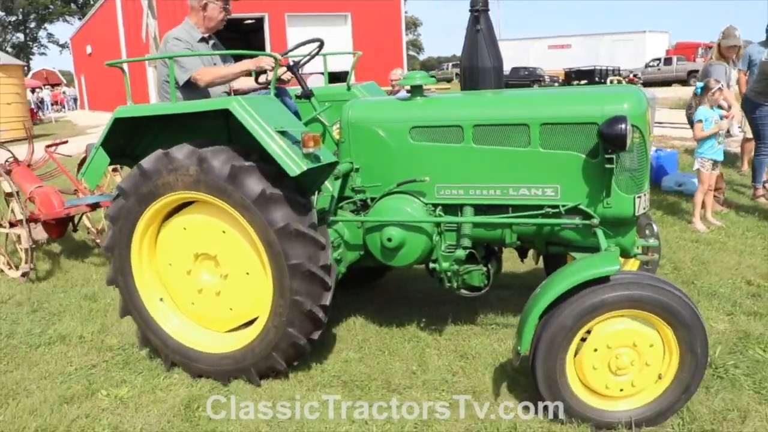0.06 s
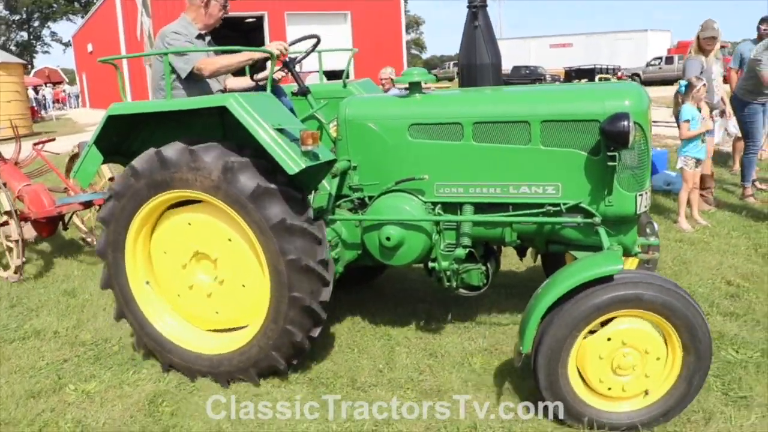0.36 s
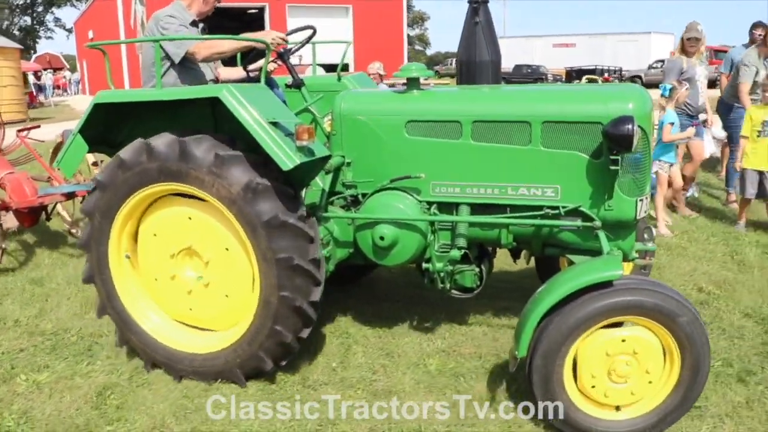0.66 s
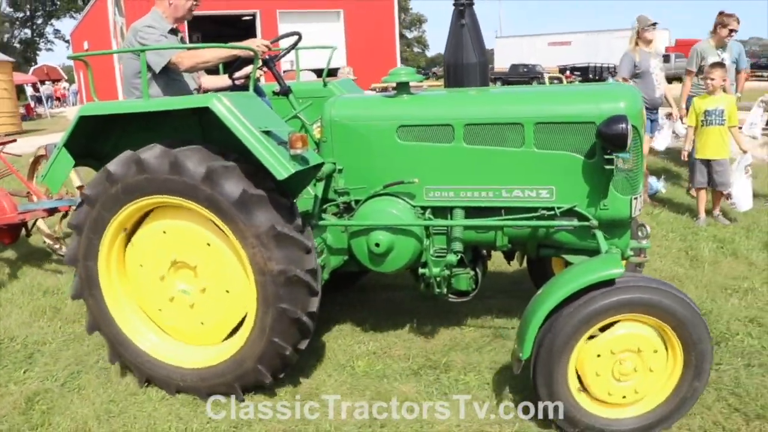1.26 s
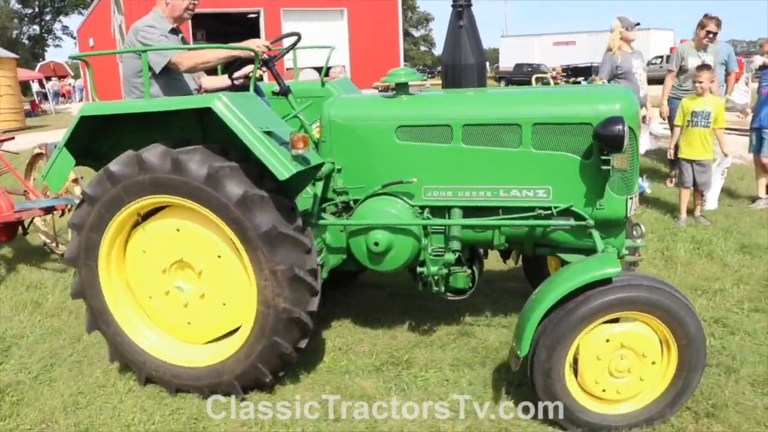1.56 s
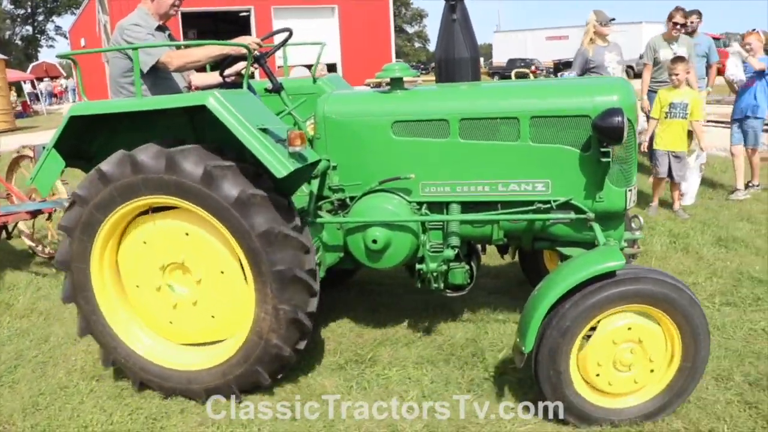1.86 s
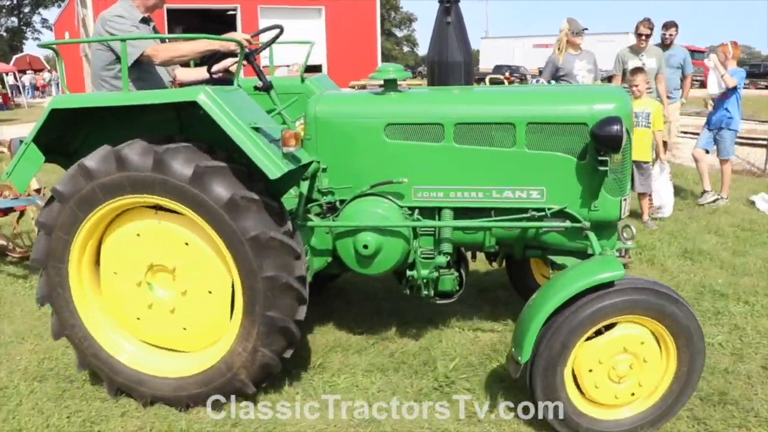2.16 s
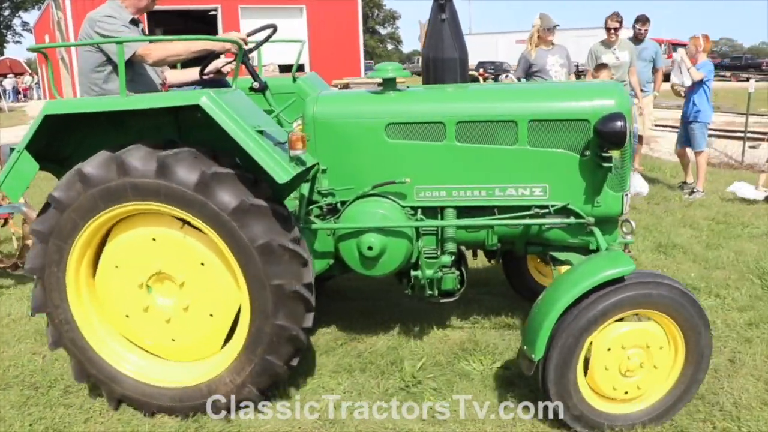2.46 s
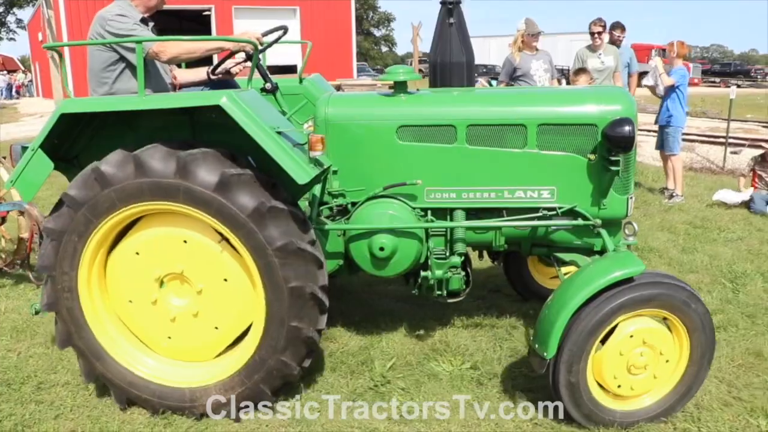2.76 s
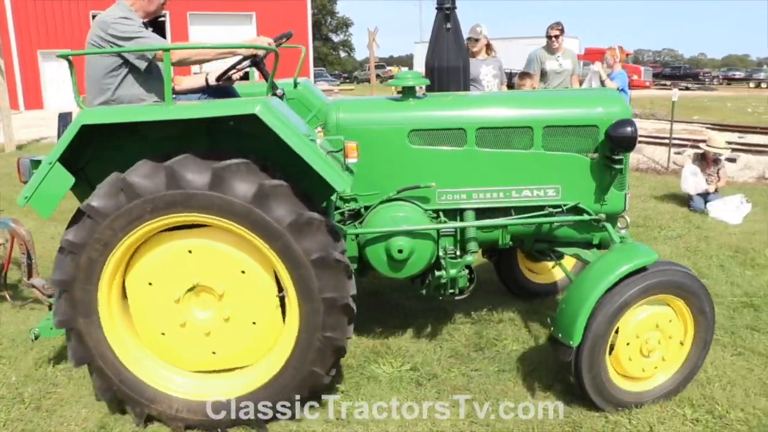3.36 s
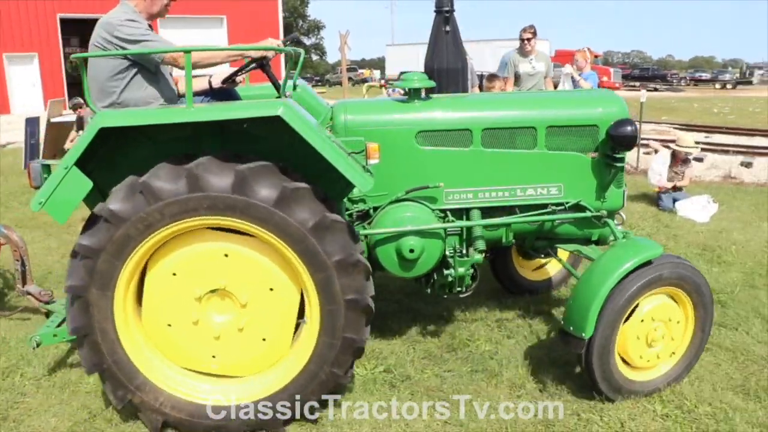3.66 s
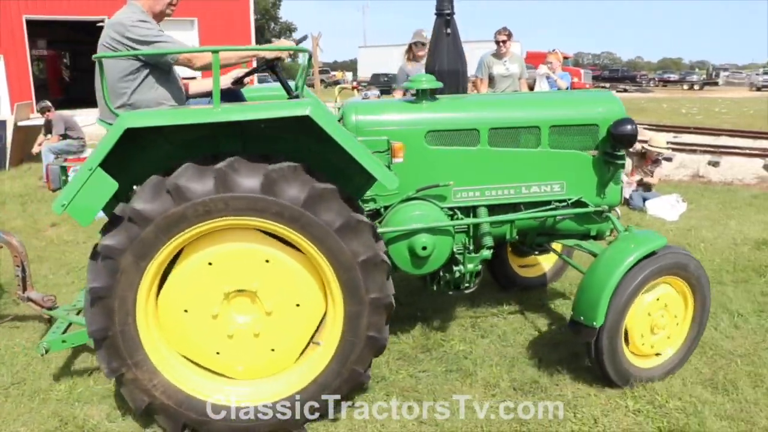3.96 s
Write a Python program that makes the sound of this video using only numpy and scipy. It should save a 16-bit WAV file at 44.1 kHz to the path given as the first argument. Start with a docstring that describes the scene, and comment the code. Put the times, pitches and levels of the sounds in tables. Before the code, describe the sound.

A single-cylinder tractor chugs slowly past outdoors, its even knocks and exhaust puffs mixed with clanking loose iron and rumbling gears. The engine eases slightly as wind buffets the microphone near the end.

```python
"""In a grassy yard, a one-cylinder two-stroke tractor rolls slowly past over the rumble of its gears.
It fires about seven times a second: the fuel goes in with a tick, the bang makes the engine block
ring, the exhaust puffs and the piston gives a soft knock. Loose iron parts clank along, and the
sheds add a short echo. Late on, a gust of wind buffets the microphone."""
import sys
import numpy as np
from scipy import signal
from scipy.fft import rfft, irfft, next_fast_len
from scipy.io import wavfile
from scipy.ndimage import map_coordinates

SR = 44100
rng = np.random.default_rng(int(sys.argv[2]) if len(sys.argv) > 2 else 0)


def pcm_store(signal):
    """Save signal as 16-bit PCM."""
    levels = np.round(np.clip(np.atleast_2d(signal), -1, 1) * 32767)
    wavfile.write(sys.argv[1], SR, levels.astype(np.int16).T)


N = 176400  # 4 seconds

# Engine firings. Each row: start in seconds, relative knock level in dB, relative tick level in dB.
FIRINGS = [(0.0191, -21, -36.5), (0.159, -21, -36), (0.3, -20, -35.5), (0.441, -20, -37), (0.584, -22, -35),
           (0.7254, -21.5, -36), (0.867, -20.5, -35), (1.0073, -21.5, -34.5), (1.1451, -22, -36.5),
           (1.281, -21.5, -39), (1.4183, -21, -41.5), (1.553, -20, -42), (1.689, -19.5, -38),
           (1.8249, -19.5, -40), (1.9602, -20.5, -42), (2.096, -20.5, -39), (2.2305, -19.5, -37.5),
           (2.3644, -21, -40.5), (2.4988, -20, -37.5), (2.6321, -21.5, -36.5), (2.7661, -20, -43),
           (2.8976, -20, -39), (3.03, -23, -45), (3.1645, -23, -45.0), (3.2989, -23, -48),
           (3.433, -21.5, -46.5), (3.5686, -23, -49), (3.7033, -21, -47), (3.8394, -25, -42),
           (3.9709, -22.5, -44.5)]
# Hits on loose iron. Each row: start in seconds, level in dB, brightness in dB, favoured pitch in Hz.
CLANKS = [(0.035, -29, -14, 1900), (0.07, -32.5, -4, 2700), (0.213, -29, 5.5, 2700), (0.318, -34, -4, 2550),
          (0.358, -32.5, 1, 1900), (0.456, -30, 3.5, 3140), (0.498, -32, 1.5, 3150), (0.602, -39, -2, 2700),
          (0.74, -34, -5, 1900), (0.785, -29, -6, 1880), (0.883, -32, 2, 2700), (0.924, -33, -7, 1890),
          (1.025, -26, -12, 2710), (1.07, -34.5, 5.5, 2650), (1.205, -40, -1, 2550),
          (1.335, -27.5, 13, 5500), (1.479, -34, -1, 3150), (1.576, -34.5, 3, 2700), (1.613, -32, 3, 2930),
          (1.709, -33.5, 4, 1900), (1.744, -34.5, 2, 1900), (1.842, -34, -17, 2550),
          (1.879, -31.5, -14, 1900), (1.986, -39, -9, 2700), (2.02, -34, -1.5, 1900),
          (2.115, -31, 0.5, 2660), (2.248, -38, -2, 3100), (2.284, -32.5, -1, 4450), (2.419, -29, 4, 2800),
          (2.652, -33, -16, 3000), (2.692, -32.5, 1.5, 2720), (2.784, -33.5, 3.5, 3100),
          (2.815, -34, 4, 3100), (2.887, -39, 10.5, 1900), (2.957, -29.5, -6, 1900), (3.184, -32, -2, 4400),
          (3.314, -31, 1.5, 4400), (3.35, -33, 0.5, 4400), (3.492, -35, 4.5, 4400),
          (3.854, -34.5, 6.5, 4370), (3.885, -36.5, 7.5, 4430)]
# The tones a struck part rings with. Each row: pitch in Hz, level in dB, seconds to fade by 60 dB.
BLOCK_TONES = [(348.5, -19, 0.14), (429, -7, 0.17), (584.6, -2, 0.074), (655.4, 1, 0.095),
               (784, 1.5, 0.091), (840, -2, 0.051), (874.4, -2, 0.059), (1032, -15, 0.14), (1357, -14, 0.2),
               (1595, -21, 0.063)]
IRON_TONES = [(1862, -5, .11), (2200, -8, .1), (2315, -11, .1), (2571, -2, .09), (2715, -.5, .07),
              (3000, -4, .085), (3100, -3, .08), (3268, -7, .08), (3577, -11, .1), (4370, -12, .07),
              (4716, -14, .1), (5510, -9, .08), (6745, -14, .08), (8050, -15, .06), (8950, -15, .06)]
SILENCER_TONES = [(125, -11, 0.04), (212, 0, 0.034), (300, -4, 0.055)]
# The colour of each noise, from bass to treble. Each row: frequency in Hz, relative level in dB.
WIND_COLOUR = [(15, -27), (33, -6), (46, -8.5), (62, 2), (85, -5), (130, -2), (200, -9.5), (300, -18.5),
               (600, -41), (2000, -68)]
GEAR_COLOUR = [(20, -50), (42, -41), (56, -29), (75, -3.5), (100, -13.5), (180, -5.5), (340, 2.5),
               (400, -7.5), (470, 2), (555, 1), (680, -2), (900, -9.5), (1500, -12.5), (2300, -22),
               (4000, -28), (6500, -34.5), (9200, -37), (12000, -47.5), (16000, -58)]
GEARBOX_COLOUR = [(200, -30), (390, 0.5), (412, -2), (426, 9.5), (440, 1.5), (462, -25), (900, -59)]
CRACK_COLOUR = [(700, -21), (1900, 4.5), (3000, 8), (3800, -3.5), (5000, -2), (9000, -16), (11000, -22),
                (16000, -68)]
TICK_COLOUR = [(800, -44), (2000, -1), (3600, -12), (4800, -3), (5700, 4.5), (6400, -4.5), (7100, -14),
               (7800, -3.5), (9200, -10.5), (10200, -30), (12500, -30), (16000, -36)]
PUFF_COLOUR = [(30, -45), (55, -25), (85, -7.5), (160, -19), (240, 10.5), (450, -7.5), (800, -1),
               (1500, -12), (3000, -13.5), (9000, -40)]
SHUDDER_COLOUR = [(30, -40), (70, -45), (150, -5), (300, -2.5), (450, -5), (700, 4.5), (900, -3),
                  (1050, -6), (1600, -8), (2200, -14.5), (3200, -17.5), (5000, -24), (9000, -31),
                  (12000, -42), (16000, -50)]
# How the background sounds rise and fall. Each row: time in seconds, level in dB.
WIND_LEVEL = [(0, -72), (1.3, -66), (1.6, -45), (1.9, -39), (2.1, -32.5), (2.4, -40), (2.62, -27),
              (2.77, -39), (2.85, -21), (2.96, -17.5), (3.1, -19), (3.26, -22), (3.44, -20.5),
              (3.59, -28.5), (3.72, -21), (3.85, -26), (4, -21)]
GEAR_LEVEL = [(0, -28.5), (.9, -28.5), (1.4, -28.5), (2.4, -28), (2.8, -30), (3.2, -30.5), (4, -31)]
GEARBOX_LEVEL = [(0, -36.5), (1, -36.5), (2.5, -33), (3.1, -40), (4, -45)]
# How long the yard echoes. Each row: frequency in Hz, seconds to fade by 60 dB.
YARD_FADE = [(100, 0.067), (500, 0.17), (3000, 0.13), (12000, 0.032)]
# The extra treble of a hard hit. Each row: frequency in Hz, dB gained for each dB of brightness.
HARD_HIT_BOOST = [(1800, 0.48), (2550, 0), (2750, 0), (3100, 0.15), (4000, .5), (5500, 0.61), (9000, 1.59),
                  (12000, 1.8), (15000, 4)]
# The silencer's thud and its two echoes. Each row: delay in seconds, relative level in dB.
THUD_ECHOES = [(0, 0), (.0082, -3.3), (.0225, -14)]

FIRING_TIMES = np.array(FIRINGS)[:, 0]
TURN_SECONDS = np.gradient(FIRING_TIMES)  # how long each turn of the engine takes
TIME, HIT_TIME = np.arange(N) / SR, np.arange(SR // 4) / SR  # seconds into the scene, and into one hit


def amp(db):
    """Turn decibels into a number to multiply by."""
    return 10 ** (np.asarray(db) / 20)


def unit(x):
    """Scale a signal to an average (rms) strength of 1."""
    return x / np.sqrt(np.mean(x ** 2) + 1e-20)


def along(points, hz):
    """Read between the rows of a frequency table, on a log scale."""
    freqs, values = np.transpose(points)
    return np.interp(np.log(hz + 1), np.log(freqs + 1), values)


def curve(rows):
    """Join the rows of a time table with straight lines."""
    return np.interp(TIME, *np.transpose(rows))


def wobble(rate):
    """A smooth curve through `rate` random points a second."""
    return map_coordinates(rng.standard_normal(4000), [TIME * rate], mode="wrap")


def filtered(x, response):
    """Multiply each frequency in x by response(hz)."""
    size = next_fast_len(len(x) + SR // 4)
    return irfft(rfft(x, size) * response(np.fft.rfftfreq(size, 1 / SR)), size)[:len(x)]


def noise(colour, size):
    """Noise of the given colour, with a strength of 1."""
    return unit(filtered(rng.standard_normal(size), lambda hz: amp(along(colour, hz))))


def burst(colour, rise_s, hold_s, fade_s):
    """A short noise that rises, holds, then drops 60 dB in fade_s."""
    shape = (1 - np.exp(-HIT_TIME / rise_s)) * amp(-60 * np.maximum(HIT_TIME - hold_s, 0) / fade_s)
    return shape * noise(colour, len(shape))


def ring(tones, rise_s, scatter_db, detune, phase_spread):
    """A struck part rings with fading tones; their level, pitch and phase vary from hit to hit."""
    hz, db, fade_s = np.transpose(tones)[:, :, None]
    level, pitch, phase = rng.standard_normal((3, len(tones), 1))
    fades = amp(db + scatter_db * level - 60 * HIT_TIME / fade_s)
    waves = np.sin(2 * np.pi * hz * (1 + detune * pitch) * HIT_TIME + phase_spread * phase)
    return (fades * waves).sum(0) * (1 - np.exp(-HIT_TIME / rise_s))


def add(track, start, sound):
    """Mix a sound into the track at `start` seconds."""
    i = int(np.clip(round(start * SR), 0, N))
    track[i:i + len(sound)] += sound[:N - i]


def yard_echo(x):
    """Sound scatters off the tractor's body and nearby sheds, leaving a short tail."""
    hz, t, spectrum = signal.stft(rng.standard_normal(SR // 3), SR, nperseg=256)
    fades = amp(-60 * t / along(YARD_FADE, hz)[:, None])
    tail = signal.istft(spectrum * fades, SR, nperseg=256)[1]
    delayed = np.pad(tail, (SR // 125, 0))  # 8 ms late
    return signal.fftconvolve(x, delayed / np.linalg.norm(tail))[:N]


def wind():
    """Wind hits the microphone with a low, lumpy rumble."""
    return amp(curve(WIND_LEVEL) + wobble(22.1)) * noise(WIND_COLOUR, N)


def gears():
    """The gears rumble, swelling a little each time the piston squeezes the air; the gearbox drones."""
    turns = np.interp(TIME, FIRING_TIMES, np.arange(len(FIRINGS)))
    swell_db = 0.78 * np.cos(2 * np.pi * (turns - .05))
    flutter_db = 1.2 * wobble(60)
    rumble = amp(curve(GEAR_LEVEL) + swell_db + flutter_db) * noise(GEAR_COLOUR, N)
    drone = amp(curve(GEARBOX_LEVEL)) * noise(GEARBOX_COLOUR, N)
    return rumble + drone


def piston_slap(turn_share=.71):
    """Late in each turn the piston rocks over and gives the block a soft, short knock."""
    out = np.zeros(N)
    damping = amp(-60 * HIT_TIME / .07)
    for start, turn_s in zip(FIRING_TIMES, TURN_SECONDS):
        jitter_s, jitter_db = rng.normal(0, [.005, 2.5])
        knock = damping * ring(BLOCK_TONES, rise_s=.002, scatter_db=2, detune=.01, phase_spread=.5)
        add(out, start + turn_share * turn_s + jitter_s, amp(-33 + jitter_db - 1.5 * start) * knock)
    return out


def iron_clanks(favour_db=7, favour_octaves=.1):
    """Loose iron clanks as the crank speeds up and slows; hard hits snap brighter and shorter."""
    out = np.zeros(N)
    for start, db, bright_db, favoured_hz in CLANKS:
        fade_s = 0.042 * amp(-.35 * max(bright_db, 0))
        crack = burst(CRACK_COLOUR, rise_s=.001, hold_s=.004, fade_s=fade_s)
        # The spot that is struck brings out the tones near one pitch.
        tones = np.array(IRON_TONES, float)
        octaves_away = np.log2(tones[:, 0] / favoured_hz)
        tones[:, 1] += favour_db * np.exp(-(octaves_away / favour_octaves) ** 2)
        ping = ring(tones, rise_s=.0009, scatter_db=1.8, detune=.0021, phase_spread=2.5)
        clank = amp(-1 + 0.074 * bright_db) * crack + amp(-3.5 - 0.03 * bright_db) * ping
        clank = filtered(clank, lambda hz: amp(bright_db * along(HARD_HIT_BOOST, hz)))
        add(out, start, amp(db) * clank)
    return out


def fuel_ticks(tint_db=2.5, grit_db=2.5):
    """Fuel squirts in at each firing with a sharp, gritty tick, never quite the same colour."""
    out = np.zeros(N)
    for start, _, db in FIRINGS:
        colour = [(hz, level + tint_db * rng.standard_normal()) for hz, level in TICK_COLOUR]
        add(out, start, amp(db + 3.5) * burst(colour, rise_s=.00085, hold_s=.0058, fade_s=.035))
    return out * unit(amp(grit_db * wobble(700)))


def exhaust(turn_share=.404):
    """Partway through each turn the exhaust opens, and a dull puff of gas makes the silencer thud."""
    out = np.zeros(N)
    for start, turn_s in zip(FIRING_TIMES, TURN_SECONDS):
        opens = start + turn_share * turn_s
        db = -19 - 0.72 * start  # quieter as the tractor moves on
        add(out, opens, amp(db - 14.5) * burst(PUFF_COLOUR, rise_s=.0012, hold_s=.02, fade_s=.09))
        thud = ring(SILENCER_TONES, rise_s=.0045, scatter_db=1.2, detune=.03, phase_spread=.1)
        for delay, echo_db in THUD_ECHOES:
            add(out, opens + delay, amp(db + 12 + echo_db) * thud)
    return out


def firing_knocks(lag_s=.0053, bounce_s=.0069, dulling_db_per_s=3):
    """Burning fuel makes the pressure jump, which rings the block and shakes the tractor's body."""
    out = np.zeros(N)
    for start, db, _ in FIRINGS:
        # The higher tones weaken as the tractor turns side-on.
        tones = [(hz, level - dulling_db_per_s * start * min(hz / 900, 1) ** 3, fade_s)
                 for hz, level, fade_s in BLOCK_TONES]
        knock = ring(tones, rise_s=.0012, scatter_db=1.3, detune=.004, phase_spread=.18)
        knock *= amp(db + 3.5 - 0.6 * start)  # quieter as the tractor moves on
        add(out, start + lag_s, knock)
        add(out, start + lag_s + bounce_s, amp(-5.5) * knock)  # the bounce off the ground
        shudder = burst(SHUDDER_COLOUR, rise_s=.0015, hold_s=.021, fade_s=.13)
        add(out, start, amp(db - 4) * shudder)
    return out


def scene():
    """Mix the engine, its echo, the gears and the wind into one channel."""
    engine = fuel_ticks() + firing_knocks() + exhaust() + piston_slap() + iron_clanks()
    return (engine + amp(-15) * yard_echo(engine) + gears() + wind())[None]


def record(dry, low_hz=34.5, top_hz=15830):
    """Soften the deepest bass and cut off the highest treble."""
    band = lambda hz: (hz < top_hz) * hz ** 3 / (hz ** 3 + low_hz ** 3)
    return np.array([filtered(x, band) for x in dry])


dry = scene()
out = record(dry)
pcm_store(out)
```